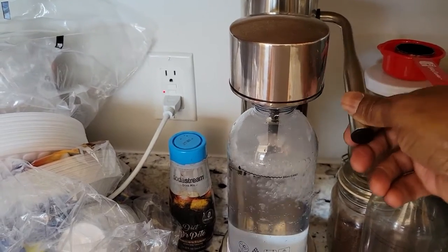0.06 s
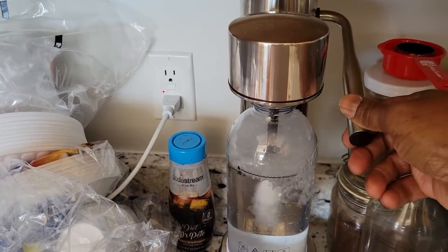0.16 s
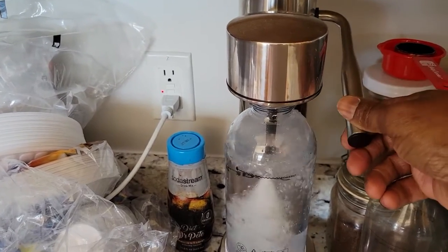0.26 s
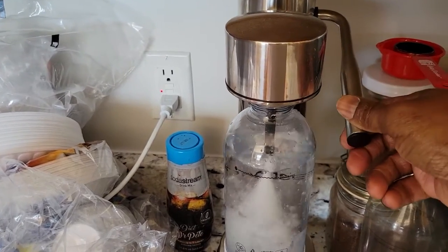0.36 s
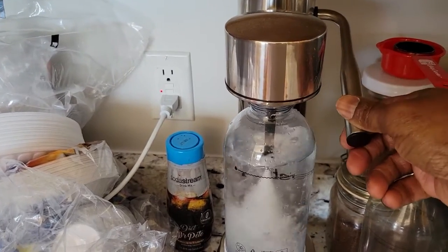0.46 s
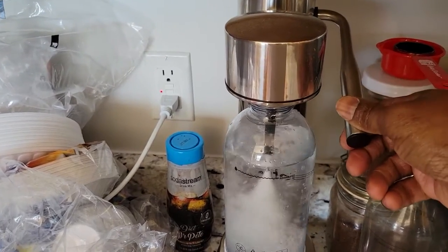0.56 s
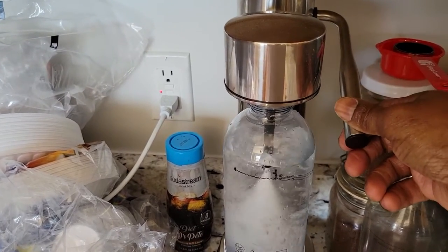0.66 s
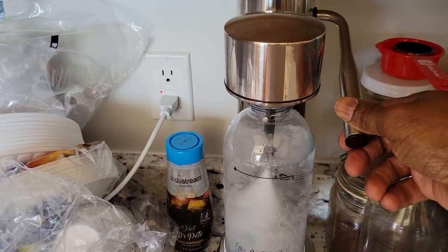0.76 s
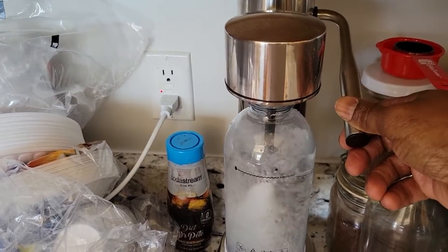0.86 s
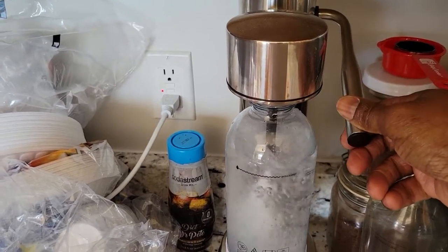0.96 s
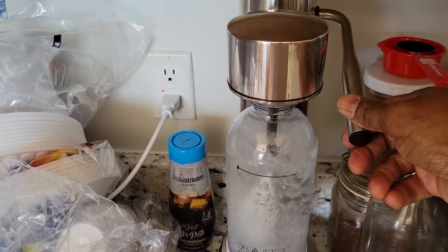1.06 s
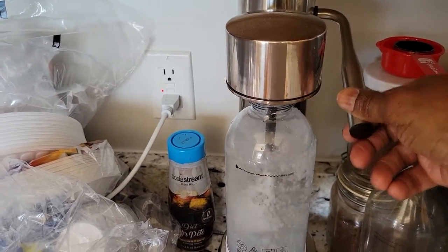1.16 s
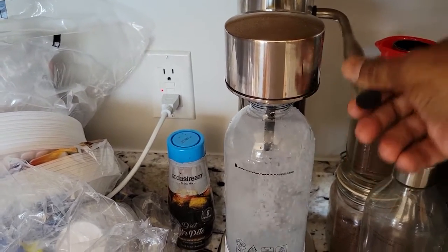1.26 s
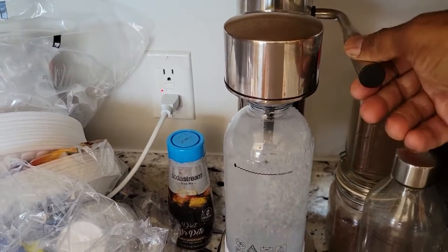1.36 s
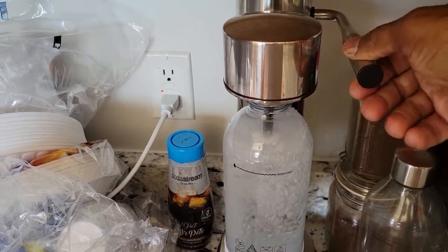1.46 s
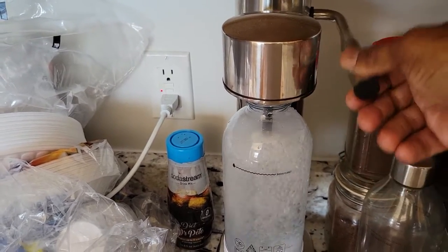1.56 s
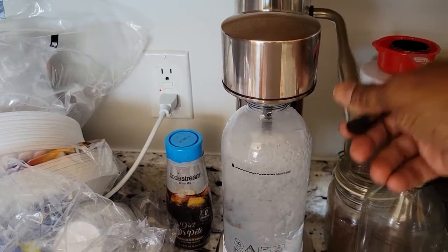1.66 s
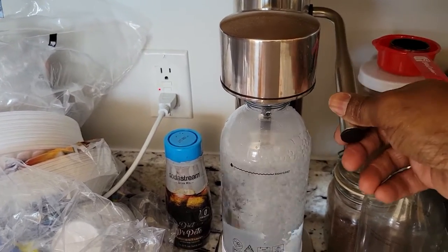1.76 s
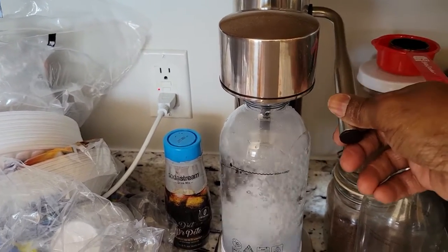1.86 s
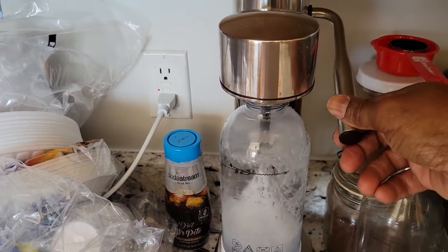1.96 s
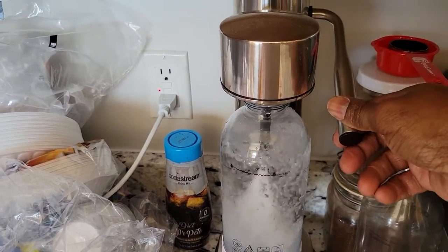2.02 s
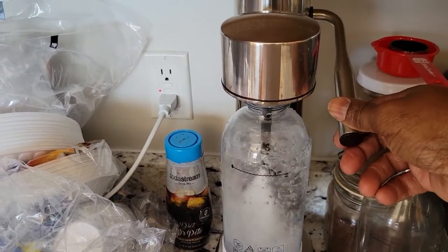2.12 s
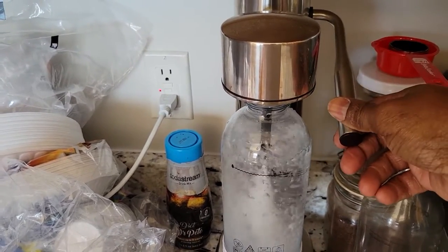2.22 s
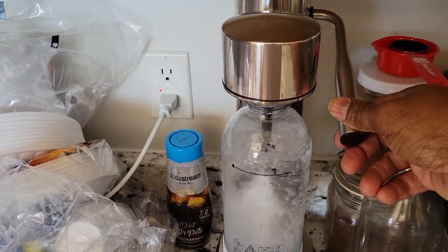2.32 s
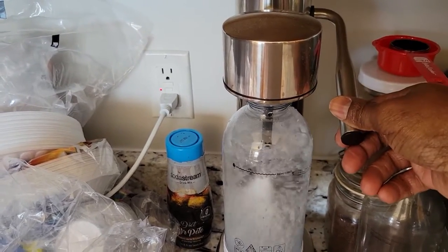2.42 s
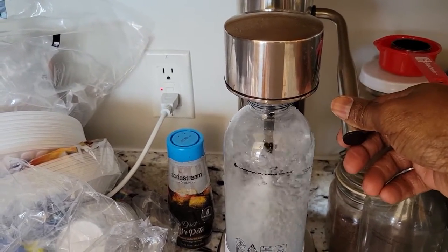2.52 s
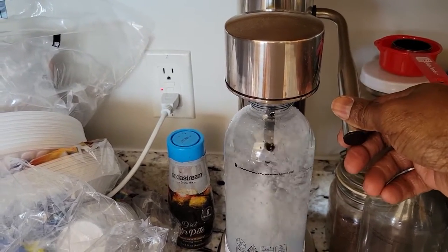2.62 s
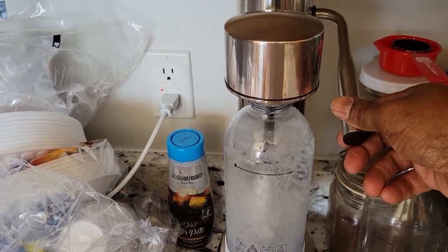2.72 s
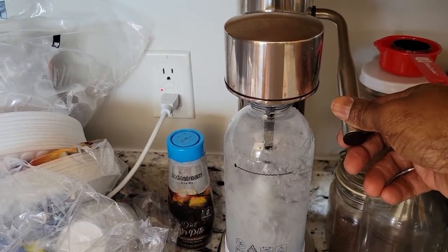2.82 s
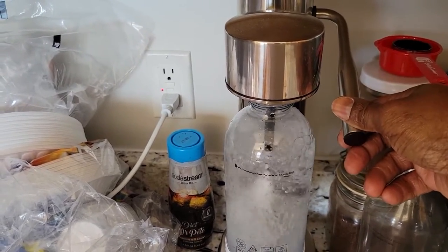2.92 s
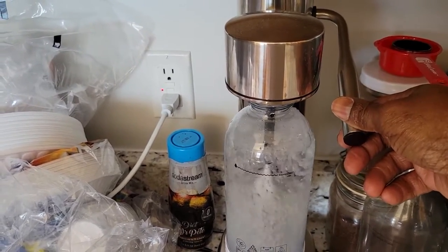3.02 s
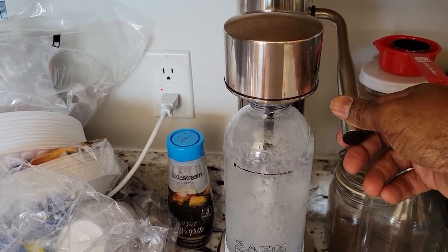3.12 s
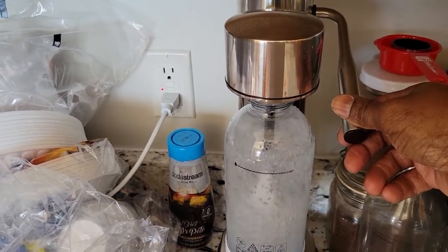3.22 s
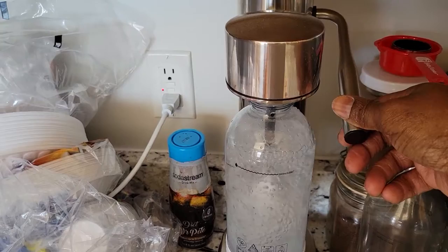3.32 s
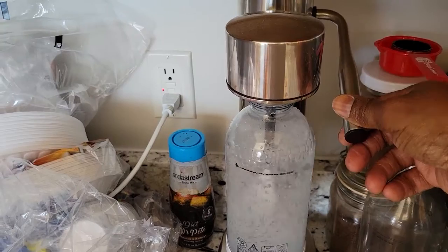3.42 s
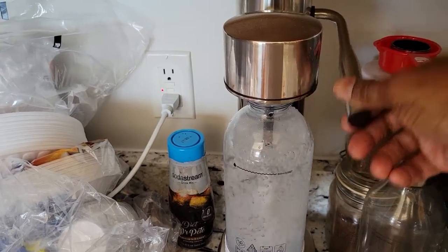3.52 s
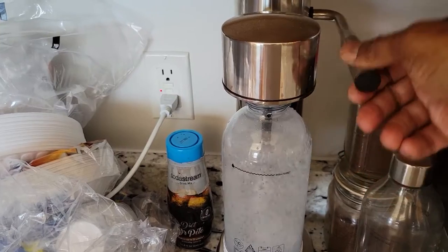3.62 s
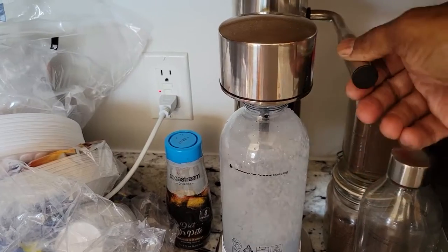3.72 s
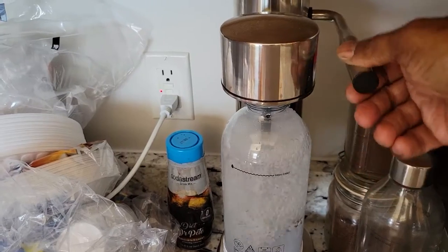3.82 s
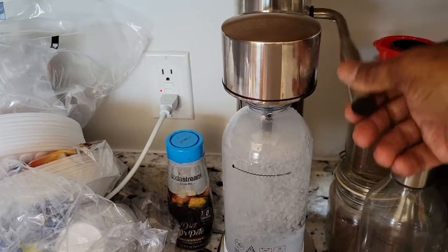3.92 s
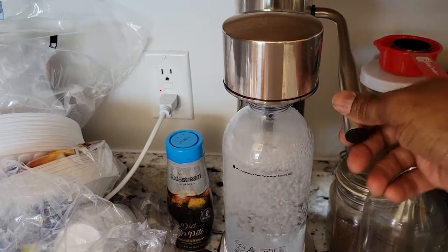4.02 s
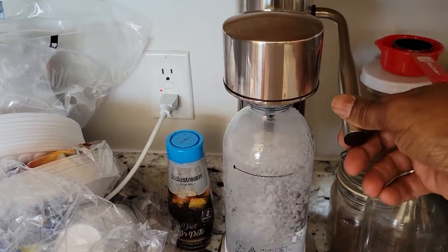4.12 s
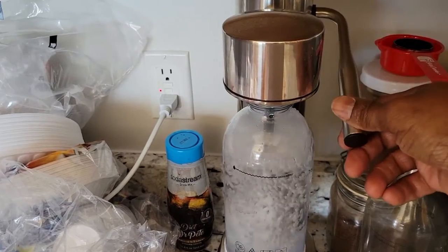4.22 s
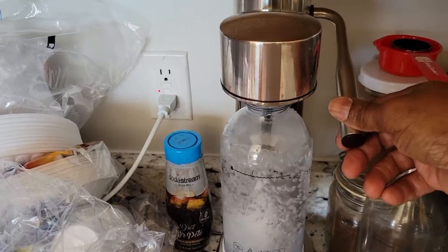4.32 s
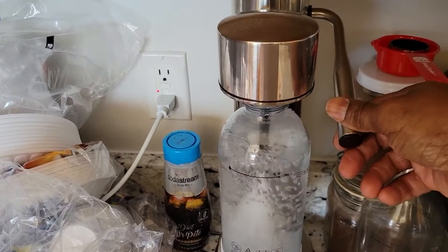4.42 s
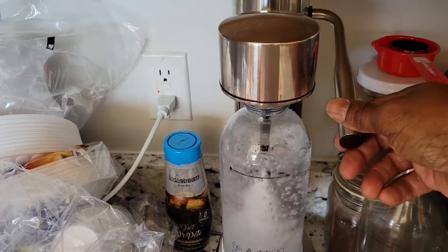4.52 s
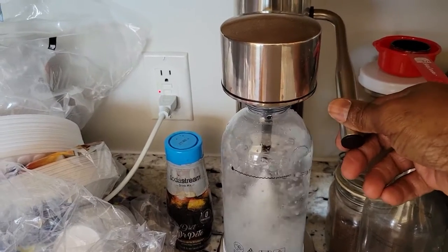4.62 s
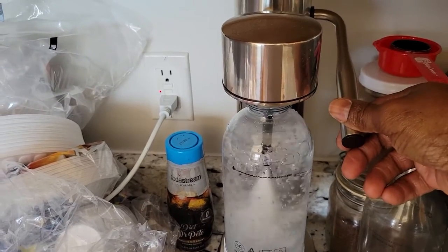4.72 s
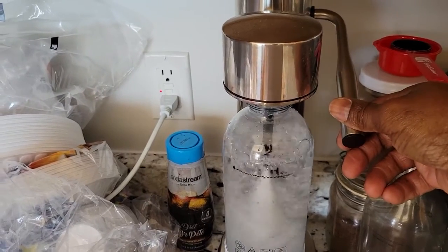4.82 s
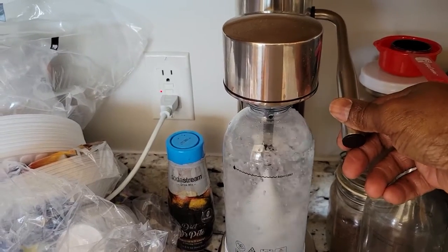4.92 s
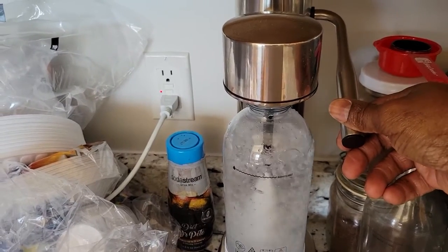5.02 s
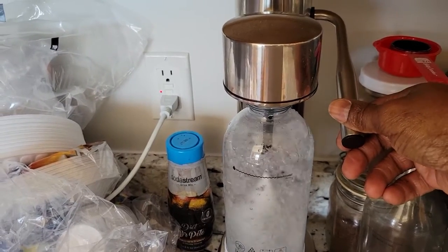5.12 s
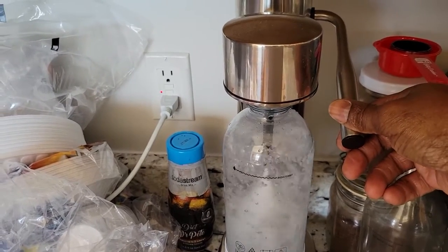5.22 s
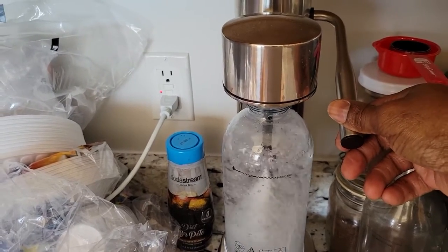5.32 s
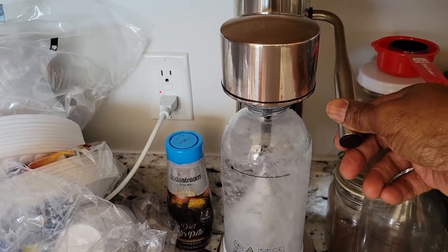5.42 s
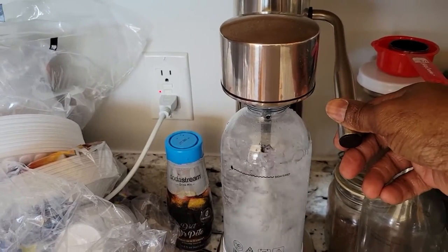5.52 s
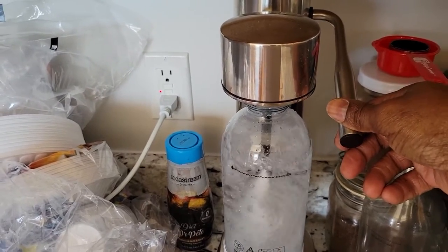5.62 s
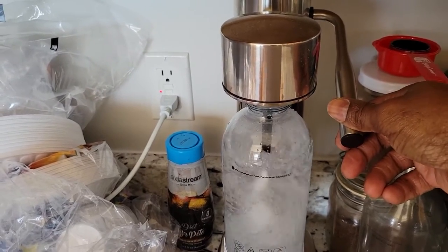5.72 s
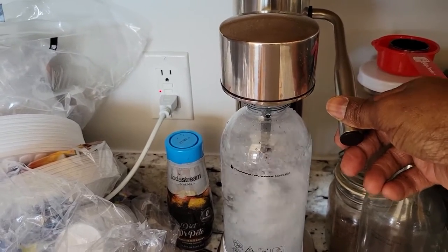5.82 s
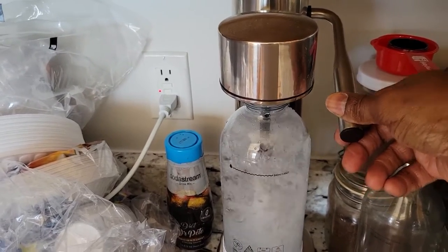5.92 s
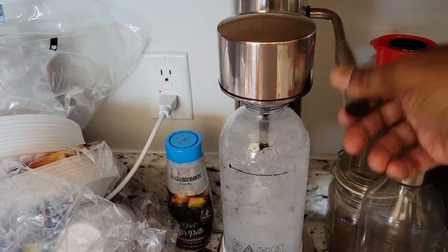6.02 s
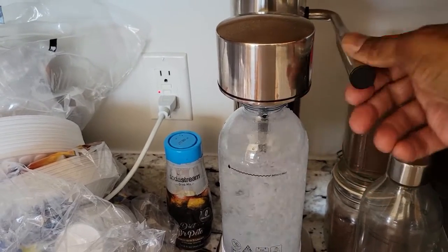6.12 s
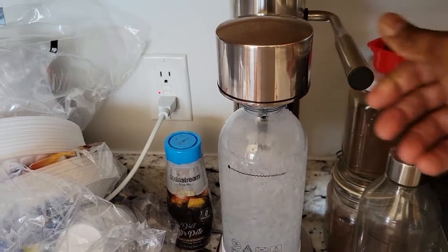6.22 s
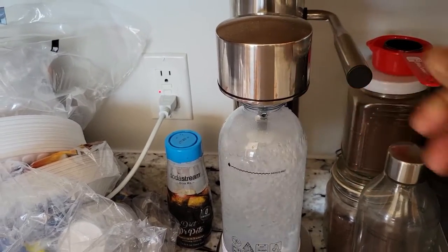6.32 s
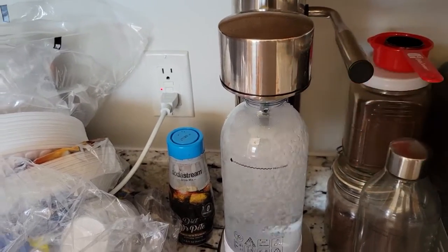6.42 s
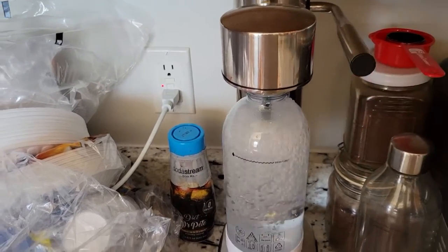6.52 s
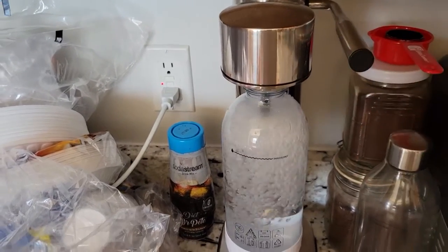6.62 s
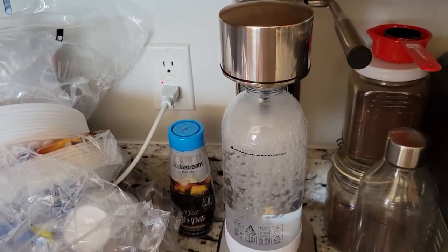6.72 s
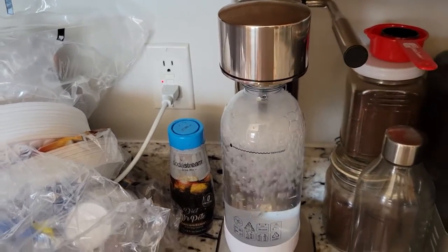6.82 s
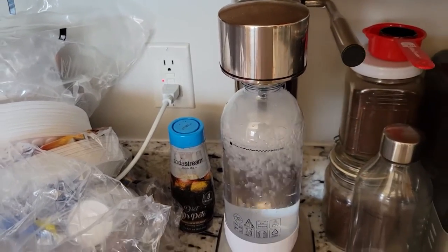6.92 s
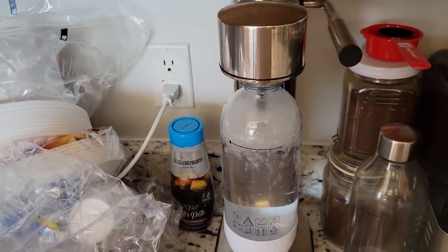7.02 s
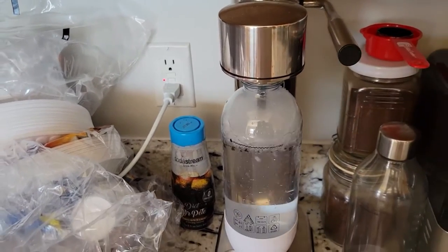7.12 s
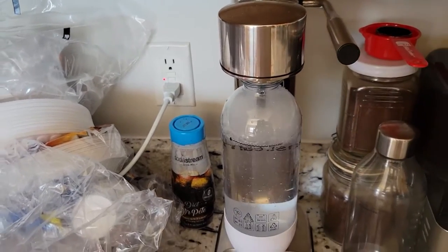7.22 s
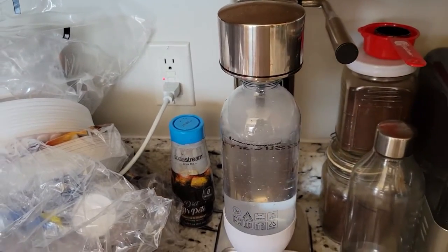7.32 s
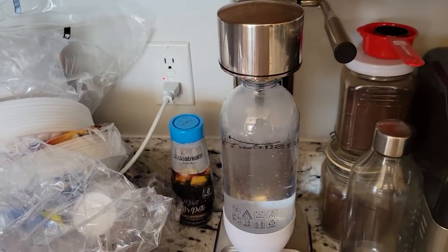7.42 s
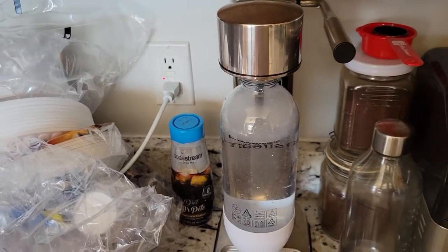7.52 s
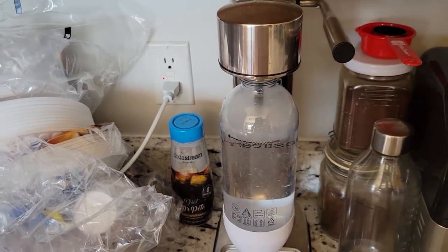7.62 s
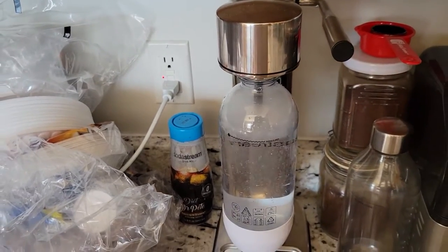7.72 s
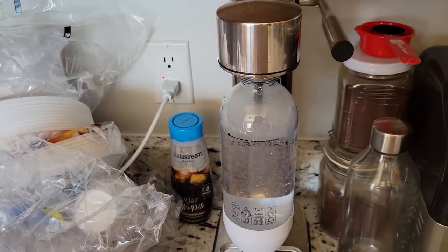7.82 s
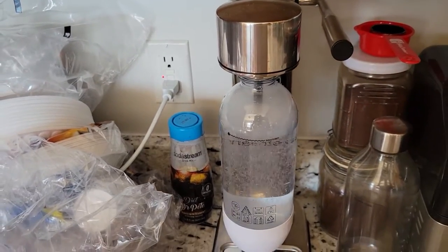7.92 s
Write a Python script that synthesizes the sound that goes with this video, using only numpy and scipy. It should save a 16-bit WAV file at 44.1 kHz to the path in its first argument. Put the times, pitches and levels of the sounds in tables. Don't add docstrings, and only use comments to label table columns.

```python
import sys
import numpy as np
from scipy import signal
from scipy.io import wavfile
from scipy.ndimage import uniform_filter1d

SR = 44100
rng = np.random.default_rng(int(sys.argv[2]) if len(sys.argv) > 2 else 0)


def file_out(sig):
    cols = np.atleast_2d(sig).T
    lim = np.clip(cols, -1, 1)
    pcm = np.round(lim * 32767).astype(np.int16)
    wavfile.write(sys.argv[1], SR, pcm)


def how_loud(loudness_db):
    steps = np.asarray(loudness_db, float) / 20
    return 10 ** steps


N = 350991

# (frequency [Hz], density [dB/Hz])
CLOUD_SPECTRUM = [(260, -61), (450, -27), (587, -31), (723, -16), (986, -9.5), (1540, -7.5), (1810, -4.5),
                  (2700, -4), (3690, -5), (4600, -10.5), (5580, -14.5), (8200, -27.5), (15500, -38.5)]
# (frequency [Hz], width [Hz], lift [dB])
BOTTLE_MODES = [(822, 120, 2), (1093, 110, -3.5), (1806, 70, 7.5), (2160, 160, 4.5), (2700, 144, 3),
                (3050, 310, 2), (3557, 130, 4), (5500, 760, 4.5), (5870, 100, 3)]
# (frequency [Hz], likeness [-1..1])
NEAR_LIKENESS = [(300, .9), (550, 0.13), (1800, 0.49), (4000, 0.11), (6000, 0.057), (15000, 0.11)]
# (frequency [Hz], left minus right [dB])
CLOUD_BALANCE = [(300, -14), (700, 3), (1500, 3), (2700, 7), (4300, 0.5), (6000, 5.5), (8500, -0.5),
                 (12000, 0.5)]
NECK_HZ, NECK_WIDTH_HZ, NECK_DB, NECK_FADE_DB_S = 2693, 180, 13.5, 6
FIZZ_DRIFT_DB, LARGE_DRIFT_DB, LARGE_CLIMB_DB_S = 1.5, 2.0, -1.5
SEEP_PER_FIZZ_CLIMB = 0.51


def bubble_cloud():
    cloud_db, centre_hz, open_db = lever_down(0.42)
    climb_db_s = building(0, column=1)
    fizz_db = building(climb_db_s, column=0) + FIZZ_DRIFT_DB * drift(2.34) + open_db - cloud_db
    seep_db = building(SEEP_PER_FIZZ_CLIMB * climb_db_s, column=2) + 1.57 * open_db
    large_db = building(LARGE_CLIMB_DB_S, column=3) + LARGE_DRIFT_DB * drift(7.9) + open_db - cloud_db
    births = (rng.random(N) < 2500.0 / SR) * how_loud(2.3 * np.minimum(rng.exponential(1, N), 4))
    churn_db = 0.41 * drift(4.6) + 1.6 * drift(40.0)

    def swarm_db(hz):
        thin = share(hz, 4527, 9200)
        fine = share(hz, 3280, 9100) * (1 - thin) * (fizz_db + 12)
        seep = thin * (seep_db - cloud_db + 28 - 6.2 * share(hz, 12800, 18000))
        large = (1 - share(hz, 1470, 1530)) * (large_db + 9.5)
        tilt = 40 * np.log2(np.clip(hz, 1600, 4200) / 2500)
        lean = tilt * np.log2(centre_hz / 2500) * (1 - share(hz, 2420, 5800))
        flicker = 1.55 * drift(17.5) + 1.11 * drift(71.0)
        return fine + seep + large + lean + (1 - thin) * churn_db + flicker

    clear_db = -0.25 * (uniform_filter1d(fizz_db, size=SR // 3) - 3.0)
    cloud = bands(births + 0.81, -3, CLOUD_SPECTRUM, NEAR_LIKENESS, CLOUD_BALANCE, swarm_db)
    cloud = through(cloud, BOTTLE_MODES, lambda: clear_db + 5.3 * drift(13.0))
    neck_db = NECK_DB - NECK_FADE_DB_S * np.arange(N) / SR
    cloud = cloud + how_loud(neck_db) * resonate(cloud, NECK_HZ, NECK_WIDTH_HZ)
    return how_loud(cloud_db) * (how_loud(4.5) * rms_one(cloud) + gurgles(centre_hz))


# (time [s], cloud level [dB], swarm pitch [Hz])
PULL_FLOWS = [
    [(0.125, -49, 2810), (0.167, -34.5, 2310), (0.383, -35, 2347), (0.66, -31.5, 2350), (1.04, -27.5, 2320),
     (1.25, -33, 2700)],
    [(1.715, -43, 2360), (1.751, -27, 2490), (1.82, -23.5, 2280), (2.08, -29, 2506), (2.3, -23.5, 2520),
     (2.65, -25, 2566), (3.1, -26.5, 2762), (3.42, -25.5, 2773), (3.57, -36.5, 2700)],
    [(4.05, -39, 2640), (4.11, -25, 2900), (4.254, -22.5, 2545), (4.44, -29.5, 2706), (4.9, -27, 2708),
     (5.3, -27, 2770), (5.574, -29.5, 2700), (5.894, -31.5, 2890), (6.035, -41, 2950)],
]
# (time [s], swell [dB], length [s])
GAS_SURGES = [(0.482, 5.5, 0.042), (0.706, 6, 0.081), (0.9, -1, 0.016), (1.016, 5, 0.018),
              (2.154, 3.5, 0.1), (2.864, 1.5, 0.15), (2.95, 3, 0.067), (3.047, 2.5, 0.009),
              (3.355, 3.5, 0.064), (4.533, 4, 0.098), (4.666, 6, .03), (4.962, 2, 0.028),
              (5.08, 3.5, 0.074), (5.477, 3, 0.11)]
SURGE_DEEPENS_HZ_PER_DB, FULL_FLOW_DB = 17, -32


def lever_down(fall_s):
    cloud_db, centre_hz = in_time(PULL_FLOWS, 0.025, fall_s)
    swell_db = swells(GAS_SURGES)
    below_full_db = np.minimum(cloud_db - FULL_FLOW_DB, 0)
    return cloud_db + swell_db, centre_hz - SURGE_DEEPENS_HZ_PER_DB * swell_db, below_full_db


# (fine fizz [dB], fizz climb [dB/s], seal seep [dB], large bubbles [dB], bottle hum [dB])
PULL_START_LEVELS = [
    (-41, -0.5, -52.5, -32.5, -55),
    (-45.5, 9.5, -55, -31, -56.5),
    (-40.5, 12.5, -54.5, -32.5, -61),
]


def building(climb_db_s, column):
    t = np.arange(N) / SR
    downs = np.array([table[0][0] for table in PULL_FLOWS])
    pull = np.clip(np.searchsorted(downs, t + 0.02) - 1, 0, None)
    return np.array(PULL_START_LEVELS)[pull, column] + climb_db_s * (t - downs[pull])


GURGLES_PER_S, GURGLE_DB, GURGLE_CYCLES, GURGLE_RISE = 380, -3.5, 60, 0.1
GURGLE_SPREAD_OCT, GURGLE_WANDER_OCT = 0.2, 0.2
LARGEST_GURGLE_HZ = 1690


def gurgles(centre_hz):
    draws = rng.random((4500, 5))
    starts = np.cumsum(-np.log(1 - draws[:, 0]) / GURGLES_PER_S)
    streams = [(drift(5.86), drift(15.0)) for _ in range(4)]
    out = np.zeros((2, N + SR))
    age = np.arange(1600) / SR
    for k, (s, (_, size, strength, slide, side)) in enumerate(zip(starts[starts < N / SR], draws)):
        at = int(s * SR)
        wander, level = streams[k % len(streams)]
        spread_oct = GURGLE_SPREAD_OCT * np.log(size / (1 - size)) / 2
        hz = centre_hz[at] * 2 ** (GURGLE_WANDER_OCT * wander[at] + spread_oct)
        hz = LARGEST_GURGLE_HZ + abs(hz - LARGEST_GURGLE_HZ)
        turns = hz * age / GURGLE_CYCLES
        rise = 1 + GURGLE_RISE * (slide - 0.3) * turns
        tone = turns * np.exp(-5.0 * turns) * np.sin(2 * np.pi * hz * age * rise)
        pan_db = (2.7 + 3.0 * (side - 0.5)) * np.array([[1], [-1]])
        out[:, at:at + len(age)] += how_loud(2.0 * level[at] + 11.0 * strength + pan_db) * tone
    return how_loud(GURGLE_DB) * rms_one(out[:, :N])


# (frequency [Hz], density [dB/Hz])
VENT_SPECTRUM = [(210, -54), (350, -5.5), (660, -32.5), (878, -15.5), (1740, -14.5), (2420, -6),
                 (2670, -6.5), (2890, -3), (3550, -5.5), (3960, -4), (7840, -7.5), (10400, -13),
                 (15500, -3)]
# (frequency [Hz], density [dB/Hz])
LEAK_SPECTRUM = [(210, -76), (350, -49), (1100, -14), (1280, -22.5), (2580, -10.5), (2800, -23),
                 (3380, -9.5), (3960, -4), (5440, -3), (6180, -6.5), (10600, -15.5), (14300, -15.5),
                 (15500, -15)]
# (frequency [Hz], width [Hz], lift [dB])
PIPE_MODES = [(2370, 130, 0.91), (2520, 56, 5.2), (2900, 330, 6.1), (3180, 56, 8.4), (4070, 130, 2.6),
              (5270, 53, 0.81), (6220, 250, 4.5), (7600, 170, 4.8), (12400, 220, 1.5), (16000, 170, 2),
              (14700, 850, 4.9)]
# (frequency [Hz], width [Hz], lift [dB])
WHISTLE_MODES = [(623, 150, -20), (1100, 260, -32), (2950, 63, 4.5), (3460, 42, 2), (3888, 87, 10.5),
                 (4810, 85, 7.5), (8750, 100, 7), (11800, 280, 5)]
# (frequency [Hz], likeness [-1..1])
VENT_LIKENESS = [(300, 0.15), (1000, 0.091), (3500, 0.61), (6000, 0.2), (15000, 0.099)]
# (frequency [Hz], left minus right [dB])
VENT_BALANCE = [(500, 1), (1500, 3.5), (3000, 2.5), (6000, 1.5), (10000, -1.5), (15000, 1.2)]


def vent():
    hiss_db, roar_db = lever_up()
    spent = np.clip((-20.5 - hiss_db) / 14, 0, 1)
    flutter_db = 0.12 * drift(4.0)

    def flow_db(hz):
        leak = spent * (at_hz(LEAK_SPECTRUM, hz) - at_hz(VENT_SPECTRUM, hz) + 3.16)
        roar = (1 - share(hz, 7500, 8100)) * (roar_db - 0.5)
        return roar + leak + flutter_db + 1.5 * drift(34.0)

    jet = bands(0.96, -2.516, VENT_SPECTRUM, VENT_LIKENESS, VENT_BALANCE, flow_db)
    jet = through(jet, PIPE_MODES, lambda: 2 * drift(1.6))
    jet = through(jet, WHISTLE_MODES, lambda: np.minimum(20.5 * spent - 6, 0))
    return how_loud(hiss_db + 6.0) * jet


# (valve opens [s], valve shuts [s], thin hiss [dB])
VALVE_RELEASES = [
    (-.4, -0.037, -29),
    (1.264, 1.6, -20),
    (3.572, 3.942, -17),
    (6.04, 8.2, -17),
]
# (time after opening [s], level [dB])
VALVE_OPENING = [(0, -12), (0.018, -4), (.08, 0)]
# (time after shutting [s], level [dB])
VALVE_SHUTTING = [(0.023, -6), (.048, -23.5), (.09, -33)]
# (hiss [dB], roar re hiss [dB])
ROAR_PER_HISS = [(-74, 8.5), (-44, 3.5), (-32.5, -2), (-24, 0.5), (-15, 3.5)]
EMPTY_S, PRESSURE_LAW_DB = 2.153, 30


def lever_up():
    tables = []
    for opens, shuts, peak_db in VALVE_RELEASES:
        age = np.arange(VALVE_OPENING[-1][0], shuts - opens, 0.02)
        held_db = peak_db + PRESSURE_LAW_DB * np.log10(np.maximum(1 - age / EMPTY_S, 0.01))
        opening = [(opens + s, peak_db + db) for s, db in VALVE_OPENING[:-1]]
        shutting = [(shuts + s, held_db[-1] + db) for s, db in VALVE_SHUTTING]
        tables.append(opening + list(zip(opens + age, held_db)) + shutting)
    hiss_db, = in_time(tables, 0.0028, 0.046)
    return hiss_db, np.interp(hiss_db, *np.transpose(ROAR_PER_HISS))


# (time [s], swell [dB], length [s])
NECK_CLEARINGS = [(.3, 13.5, 0.14), (.55, 10, 0.052), (.75, 5, 0.059), (.96, 7, 0.024), (1.1, 1, 0.033),
                  (1.85, 1, 0.13), (2.37, 11.5, 0.071), (2.68, 5, .07), (3.17, 3, 0.073), (3.4, -2, 0.037),
                  (4.43, 8, 0.031), (4.6, 10.5, .05), (4.85, 13, 0.044), (5.06, 9, 0.068), (5.28, 7, 0.1),
                  (5.5, 10.5, 0.048), (5.72, 6, 0.096)]
HUM_HZ, HUM_WIDTH_HZ, HUM_CLIMB_DB_S, HUM_DRIFT_DB = 373.5, 22, 0.6, 2.0


def bottle_hum():
    hum_db = building(HUM_CLIMB_DB_S, column=4) + swells(NECK_CLEARINGS)
    hum_db = hum_db + HUM_DRIFT_DB * drift(5.0) + lever_down(0.19)[-1]
    rush = rng.standard_normal(N) + 0.5 * rng.standard_normal((2, N))
    air = resonate(resonate(rush, HUM_HZ, HUM_WIDTH_HZ), HUM_HZ, 40)
    return how_loud(hum_db + 3.5) * rms_one(air) * how_loud(np.array([[-1.2], [1.2]]))


# (time [s], spray peak [dB], t60 [s], crack [dB])
VALVE_SPITS = [
    (0.833, -34, 0.061, -12),
    (5.596, -39, .1, -40),
    (5.603, -21.5, 0.079, -30),
    (5.6096, -15, 0.029, 0),
    (5.6124, -22, 0.041, -10),
    (5.6198, -27, 0.08, -12),
    (5.651, -29, 0.033, -11),
]
# (frequency [Hz], width [Hz], lift [dB])
VALVE_MODES = [(950, 190, 13.5), (3260, 690, 6), (5900, 4000, 13.5), (15300, 1300, 9)]


def spits():
    burst, cracks = np.zeros(N), np.full(N, 1e-18)
    age = np.arange(SR // 4) / SR
    for s, peak_db, t60_s, crack_db in VALVE_SPITS:
        at = round(s * SR)
        burst[at:at + len(age)] += how_loud(peak_db - 60 * age / t60_s)
        cracks[at] += how_loud(crack_db)
    spray = burst * (rng.standard_normal(N) + 1.65 * rng.standard_normal((2, N)))
    thin = signal.butter(1, [700, 7000], "band", fs=SR, output="sos")
    return signal.sosfilt(thin, through(how_loud(-6.0) * spray + cracks, VALVE_MODES, lambda: 0))


# (time [s], peak [dB], pitch [Hz], t60 [s])
LEVER_KNOCKS = [(0.047, -33, 543, 0.037), (1.68, -35.5, 553, 0.042), (3.499, -72, 975, 0.055),
                (4.011, -44, 336, 0.09), (4.049, -41, 527, 0.046), (5.717, -50, 380, 0.046),
                (6.013, -41.5, 550, 0.12), (6.252, -24.5, 333, 0.024), (6.495, -20.5, 950, 0.048),
                (6.565, -40, 815, 0.044)]
# (time [s], peak [dB], pitch [Hz], t60 [s])
COUNTER_THUMPS = [(1.276, -40, 56, 0.23), (1.9, -39, 55.7, 0.18), (2.228, -35, 58, 0.15),
                  (3.609, -33.5, 85.5, 0.1), (3.969, -49, 53.4, 0.082), (5.611, -39, 118, 0.31)]


def knocks():
    out = np.zeros(N)
    age = np.arange(SR // 2) / SR
    for s, peak_db, hz, t60_s in LEVER_KNOCKS + COUNTER_THUMPS:
        at = round(s * SR)
        rattle_level = 0.8 if 200 < hz < 700 else 0.3
        rattle = rattle_level * rms_one(resonate(rng.standard_normal(len(age)), 1.4 * hz, 1.2 * hz))
        envelope = how_loud(peak_db + 5.0 - 60 * age / t60_s) * (1 - np.exp(-age / 0.0052))
        out[at:at + len(age)] += envelope * (0.96 * np.sin(2 * np.pi * hz * age) + rattle)
    return out


NOOK_T60_S, NOOK_DB = 0.06, -9


def nook():
    age = np.arange(round(0.2 * SR)) / SR
    echoes = rng.standard_normal((2, len(age))) * how_loud(-60 * age / NOOK_T60_S) * (age > 0.0015)
    return how_loud(NOOK_DB) * echoes / np.sqrt(np.sum(echoes ** 2, axis=1, keepdims=True))


# (frequency [Hz], density [dB/Hz])
ROOM_SPECTRUM = [(15, -30), (25, -19), (84, 15.0), (135, 13.0), (253, 3.5), (426, -5.0), (551, -20.0),
                 (648, 4), (726, -11.5), (911, -24), (1200, -12), (1560, -64), (2640, -120), (3000, -19),
                 (16000, -21)]
# (time [s], level [dB])
ROOM_LEVELS = [(0.0, -50.5), (0.49, -47), (1.33, -50.5), (1.99, -50), (4.03, -51), (4.9, -50), (6.3, -50),
               (6.74, -55.5), (7.96, -55)]
# (frequency [Hz], likeness [-1..1])
ROOM_LIKENESS = [(30, .9), (100, .76), (300, 0.4), (600, 0.04), (2000, 0.05)]
# (frequency [Hz], width [Hz], level [dB])
APPLIANCE_HUMS = [
    (50.6, 20.7, -50),
    (226.5, 3.8, -58.5),
    (250.2, 2.8, -60),
]


def room_tone():
    level_db, = in_time([ROOM_LEVELS], 1, 1)
    balance = [(50, 0.88), (250, -0.045)]   # (frequency [Hz], left minus right [dB])
    rumble = rms_one(bands(1, -15, ROOM_SPECTRUM, ROOM_LIKENESS, balance, lambda hz: 2.8 * drift(9.6)))
    hums = 0
    for hz, width_hz, hum_db in APPLIANCE_HUMS:
        noise = rng.standard_normal(N) + 0.1 * rng.standard_normal((2, N))
        hums = hums + how_loud(hum_db + 49.5) * rms_one(resonate(noise, hz, width_hz))
    return how_loud(level_db) * (how_loud(-2.5) * through(rumble, WHISTLE_MODES[:2], lambda: 0) + hums)


def bands(grain, first, spectrum, likeness, balance, gain_db):
    out = 0
    edges = 1000 * 2 ** (np.arange(first, 14) / 3 - 0.27)
    white = rng.standard_normal((2, 2, N)) * grain
    for k, (low, high) in enumerate(zip(edges, edges[1:])):
        band = signal.butter(2, [low, high], "band", fs=SR, output="sos")
        mid, side = signal.sosfilt(band, white[k % 2])
        hz = np.sqrt(low * high)
        alike = np.clip(at_hz(likeness, hz), -1, 1)
        pan_db = at_hz(balance, hz) / 2
        pair = np.sqrt(1 + alike) * mid + np.sqrt(1 - alike) * side * [[1], [-1]]
        level = how_loud(at_hz(spectrum, hz) + gain_db(hz))
        out = out + level * how_loud(np.array([[pan_db], [-pan_db]])) * pair
    return out


def through(x, modes, sharpen_db):
    lifted = 0
    for hz, width_hz, lift_db in modes:
        lifted = lifted + (how_loud(lift_db) - 1) * how_loud(sharpen_db()) * resonate(x, hz, width_hz)
    return x + lifted


def resonate(x, hz, width_hz):
    r = np.exp(-np.pi * width_hz / SR)
    zeros = np.array([1, 0, -1]) * (1 - r * r) / 2
    return signal.lfilter(zeros, [1, -2 * r * np.cos(2 * np.pi * hz / SR), r * r], x)


def drift(rate_hz):
    r = np.exp(-2 * np.pi * rate_hz * 40 / SR)
    slow = signal.lfilter([1], [1, -2 * r, r * r], rng.standard_normal(N // 40 + 2002))[2000:]
    return np.interp(np.arange(N) / 40, np.arange(len(slow)), rms_one(slow))


def swells(rows):
    t = np.arange(0, N, 32) / SR
    humps = sum(db * np.exp(-((t - s) / length_s) ** 2) for s, db, length_s in rows)
    return np.interp(np.arange(N) / SR, t, humps)


def in_time(tables, rise_s, fall_s):
    rows = []
    for table in tables:
        first, last = table[0], table[-1]
        rows += [(first[0] - rise_s, -95, *first[2:]), *table, (last[0] + fall_s, -95, *last[2:])]
    s, *columns = np.transpose(rows)
    return [np.interp(np.arange(N) / SR, s, c) for c in columns]


def at_hz(points, hz):
    points_hz, values = np.transpose(points)
    return np.interp(np.log(hz), np.log(points_hz), values)


def share(hz, low_hz, high_hz):
    return np.clip(np.log(hz / low_hz) / np.log(high_hz / low_hz), 0, 1)


def rms_one(x):
    return x / np.sqrt(np.mean(x ** 2) + 1e-20)


def scene():
    near = bubble_cloud() + vent() + knocks()
    valve = spits()
    reflected = signal.fftconvolve(near + 0.28 * valve, nook(), axes=1)[:, :N]
    return near + valve + reflected + bottle_hum() + room_tone()


def top_cut(x):
    return signal.sosfilt(signal.butter(12, 16600, fs=SR, output="sos"), x)


def record(dry):
    late = np.array([np.roll(dry[0], shift=3), dry[1]])
    rounded = 0.9 * np.tanh(late / 0.9)
    steep = signal.ellip(12, 0.5, 90, 15850, fs=SR, output="sos")
    return top_cut(signal.sosfilt(steep, rounded))


dry = scene()
out = record(dry)
file_out(out)
```